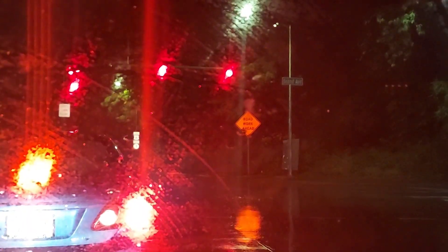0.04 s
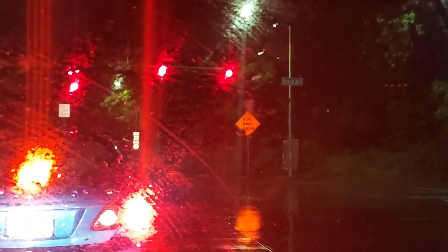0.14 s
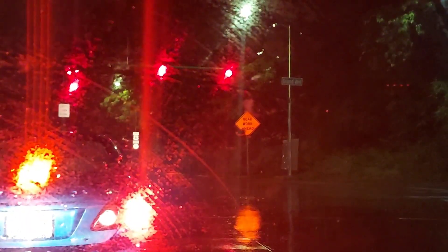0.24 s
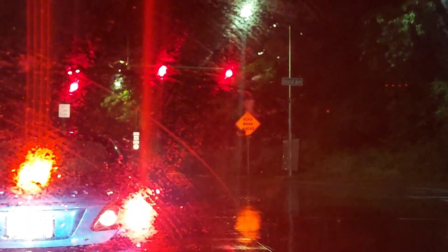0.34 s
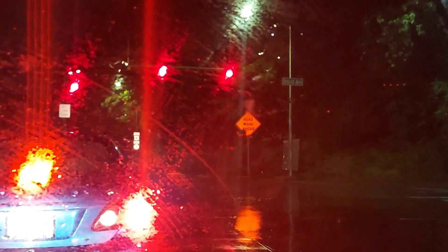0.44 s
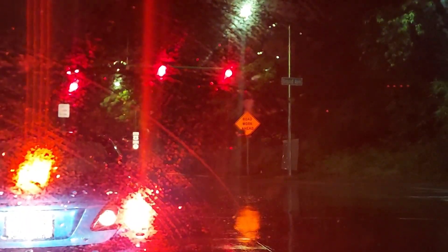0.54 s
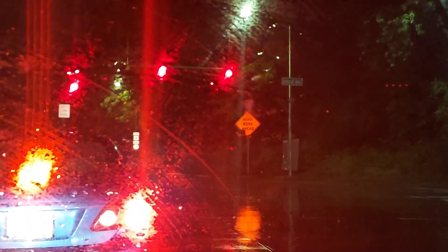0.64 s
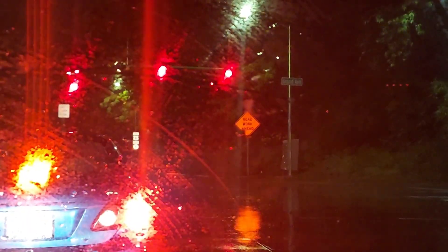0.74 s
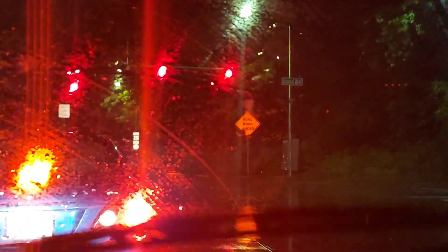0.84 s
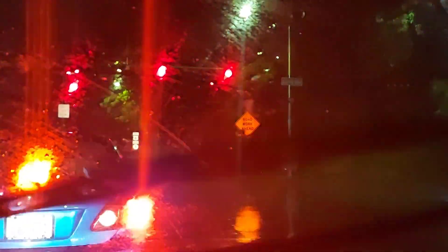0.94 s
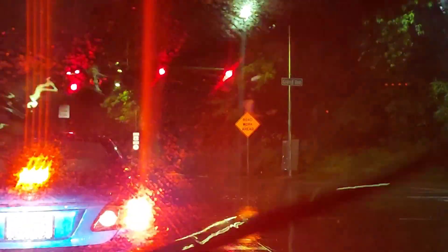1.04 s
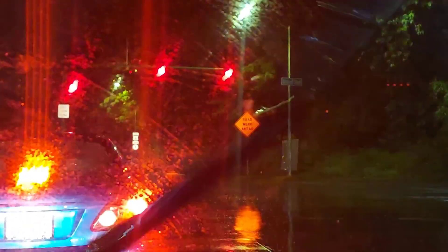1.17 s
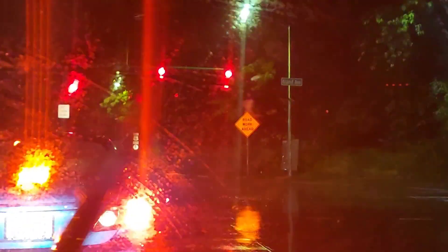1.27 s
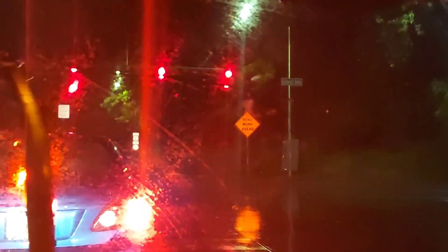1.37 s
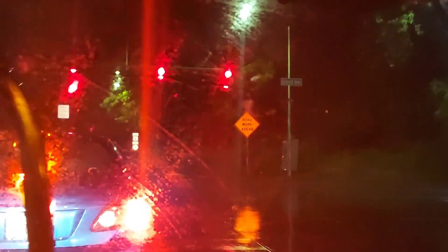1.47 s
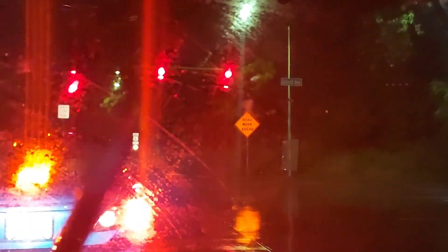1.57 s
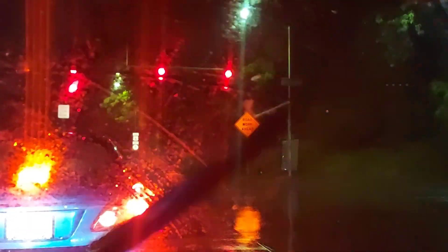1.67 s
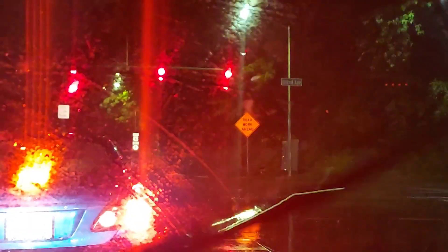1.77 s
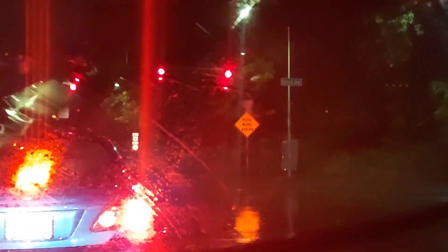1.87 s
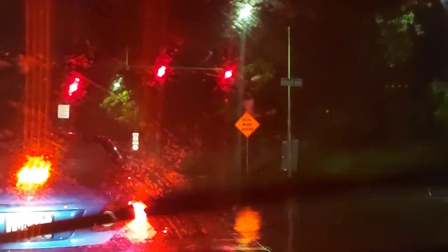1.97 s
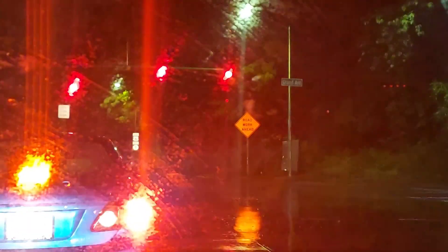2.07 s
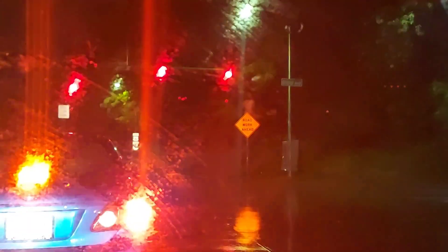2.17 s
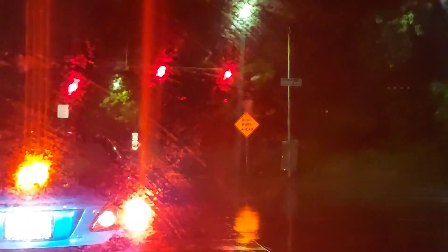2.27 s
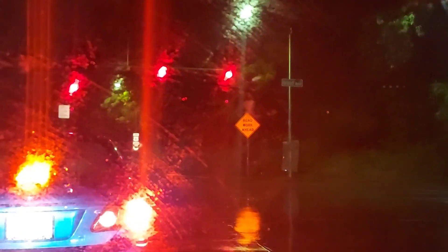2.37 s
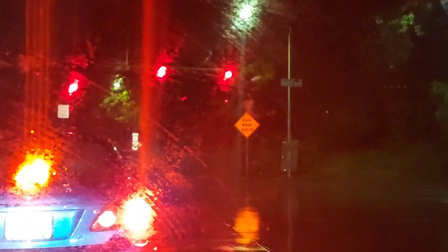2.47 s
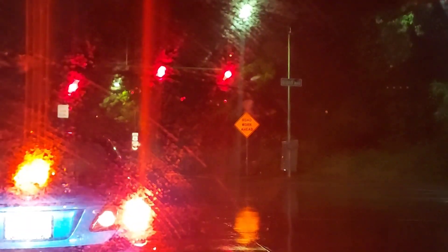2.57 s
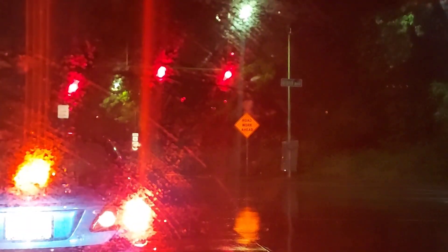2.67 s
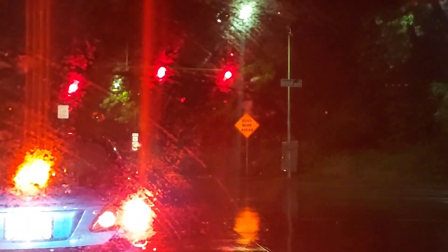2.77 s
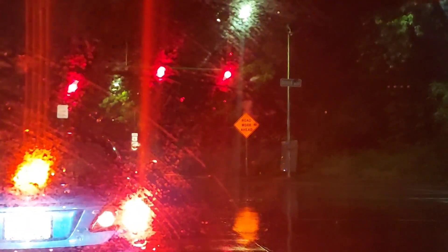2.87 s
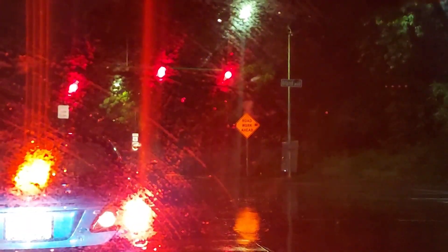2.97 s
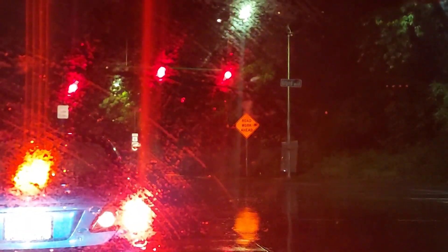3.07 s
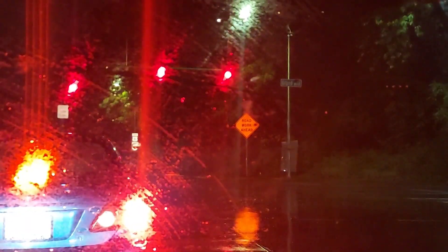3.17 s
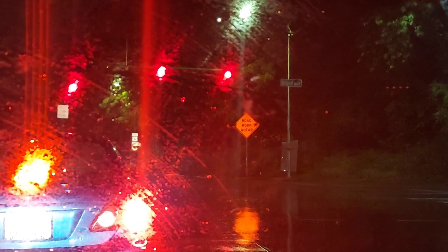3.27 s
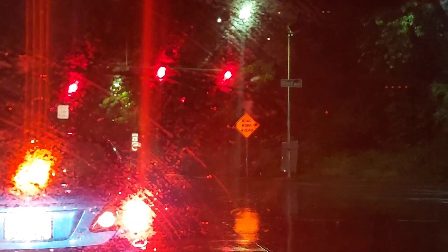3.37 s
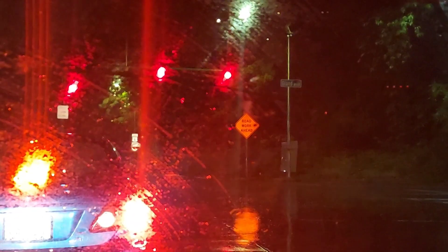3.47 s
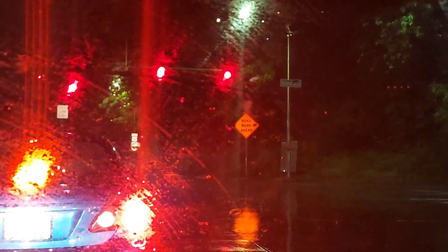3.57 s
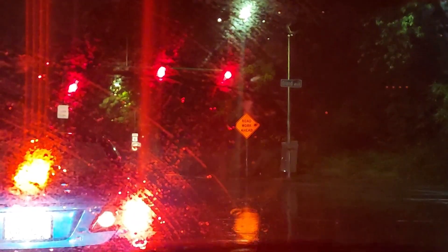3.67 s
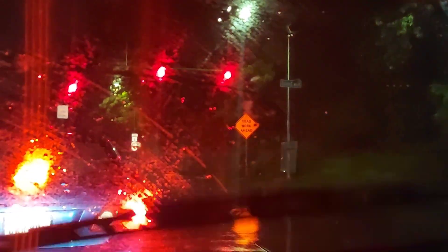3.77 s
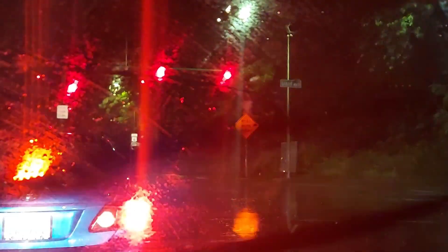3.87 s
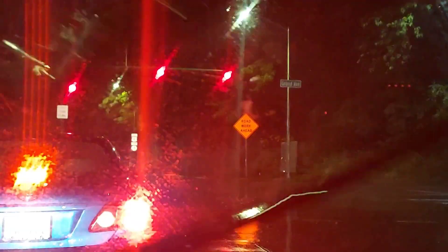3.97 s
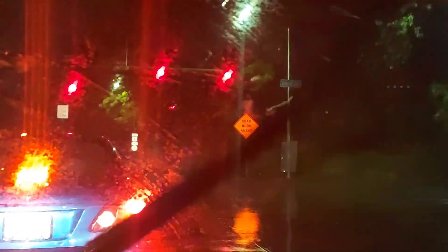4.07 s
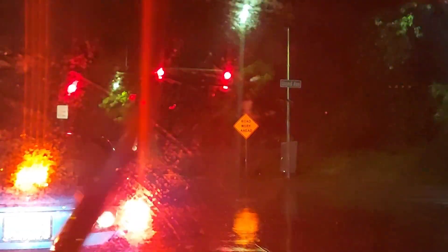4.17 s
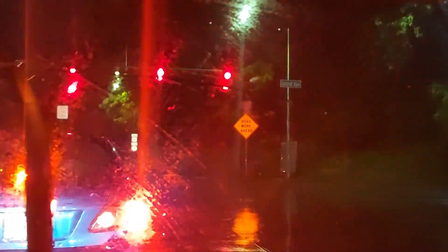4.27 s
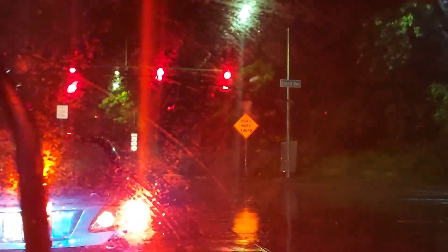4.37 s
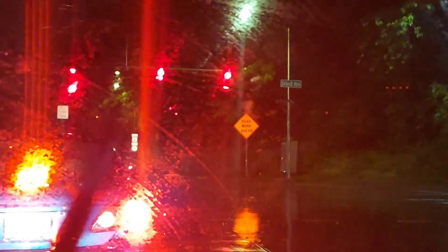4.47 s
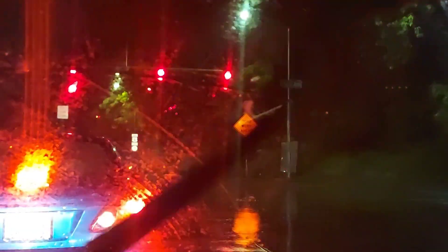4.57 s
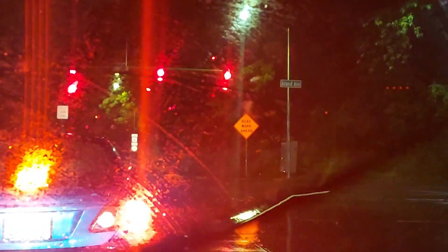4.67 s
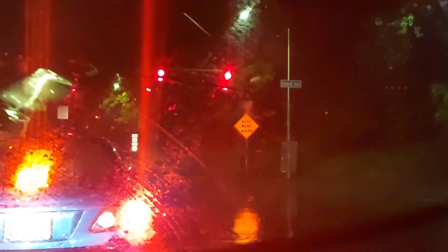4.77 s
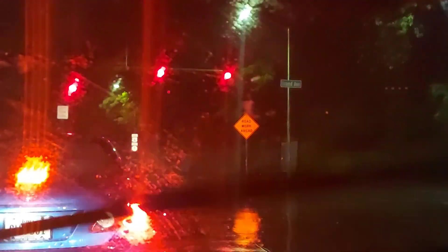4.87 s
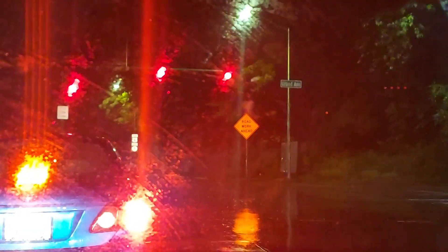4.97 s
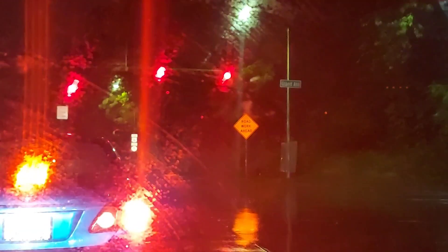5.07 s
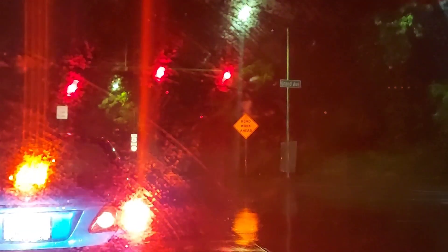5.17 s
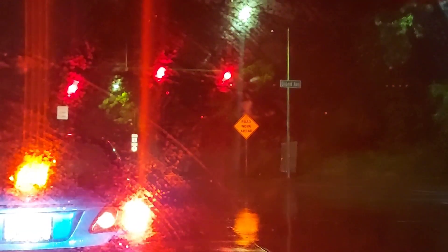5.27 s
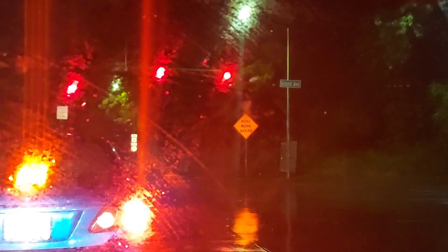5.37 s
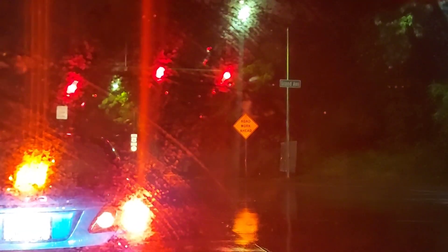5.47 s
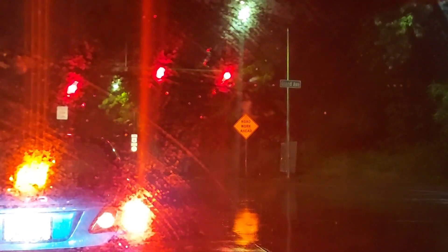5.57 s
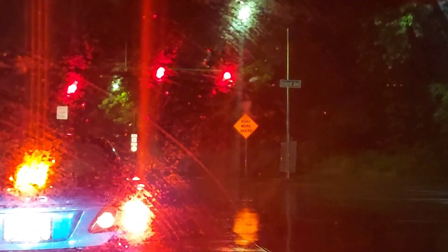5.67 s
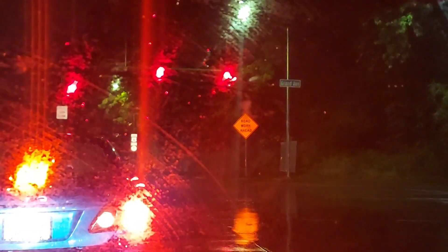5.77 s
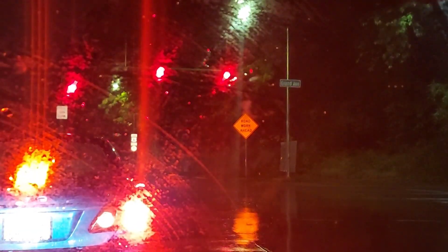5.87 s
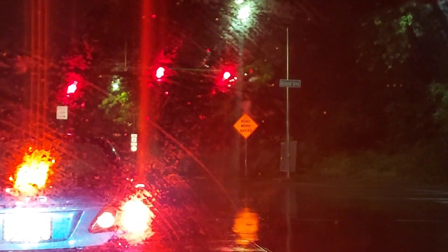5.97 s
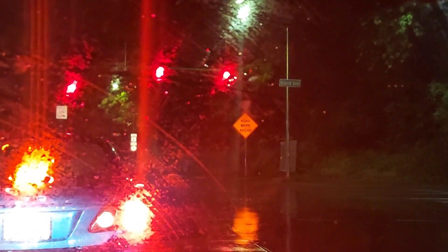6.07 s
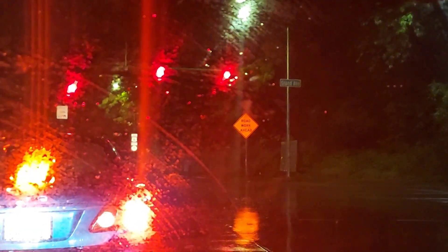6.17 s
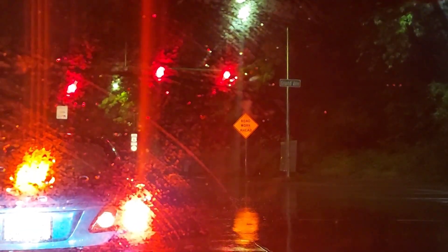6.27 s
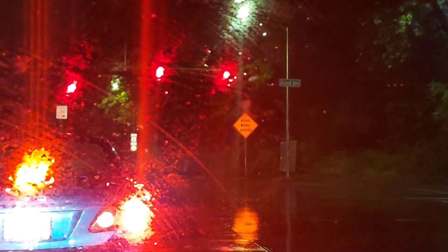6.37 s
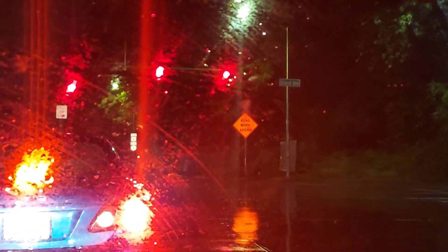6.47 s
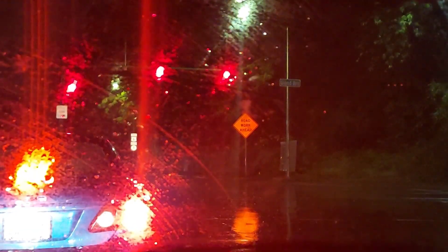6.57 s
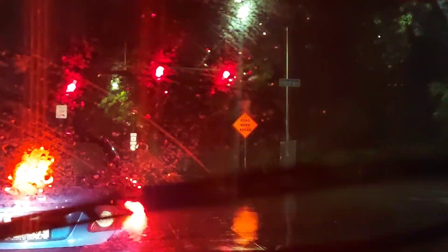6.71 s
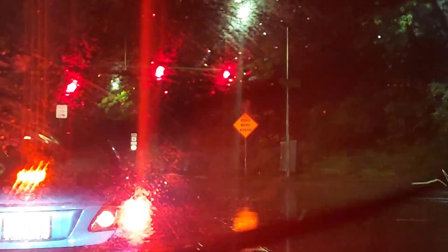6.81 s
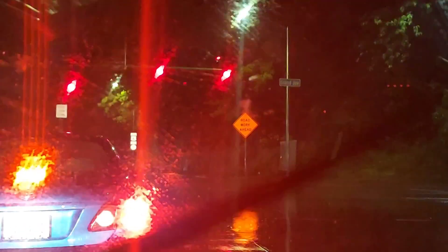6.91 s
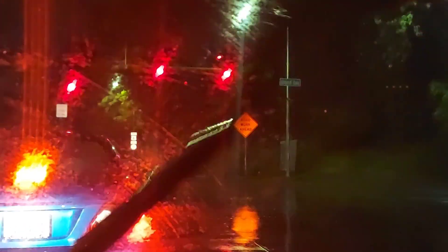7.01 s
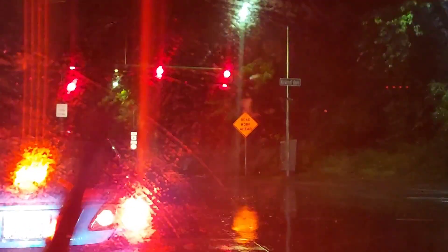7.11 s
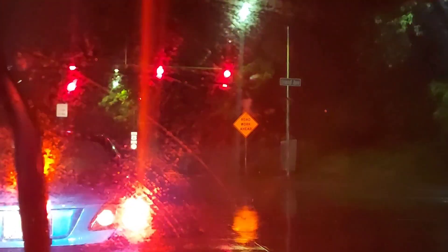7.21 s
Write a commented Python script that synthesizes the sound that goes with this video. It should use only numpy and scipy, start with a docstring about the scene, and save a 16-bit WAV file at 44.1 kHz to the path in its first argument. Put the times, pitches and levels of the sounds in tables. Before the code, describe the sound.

Inside an idling car in night rain, wipers sweep every few seconds with paired deep thuds and rubbery drag over low cabin rumble.

```python
"""Inside a car idling in the rain at night, the wipers make a sweep every few seconds.
The blades flip with a thud as they set off and at the top: runs of slips ring the body, and rubber slaps the glass.
Between flips the rubber drags as filtered noise and the arm judders as gliding sines.
The engine hums in sines, a blower whirs in narrow noise bands, and rain is a wash of shaped noise
with small and large drops, over a low cabin rumble."""
import sys
import numpy as np
from scipy import signal
from scipy.fft import rfft, irfft
from scipy.io import wavfile
from scipy.ndimage import uniform_filter1d

SR = 44100
rng = np.random.default_rng(int(sys.argv[2]) if len(sys.argv) > 2 else 0)


def master_out(mix):
    """Clip the mix to full scale and print it as 16-bit PCM to the path in sys.argv[1]."""
    frames = np.transpose(np.atleast_2d(mix))
    ceiling = np.clip(frames, -1, 1)
    pcm = np.round(ceiling * 32767).astype(np.int16)
    wavfile.write(sys.argv[1], SR, pcm)


N = 319408  # length in samples

# All levels are mix levels, ahead of the tone shaping in record().
# Ringing modes of dash, glass and cabin: (f/Hz, t60/s, first swing before force, negative = inward)
BODY_MODES = [(48.85, .366, .086), (69.2, .415, -.2255), (109.3, .243, -.169), (117.9, .114, .384),
              (139.4, .157, -.064), (247.9, .25, .0126)]
# A flip rolls along the blade as a run of slips, one table per kind: setting off, turning, a soft extra slap:
# (slips, spacing t/s, index of strongest slip, spread in slips, direction,
#  slap peak t/s after the first slip, slap width t/s at 300 Hz)
SET_OFF = (5, .0073, 7.68, 6.68, -1, .005, .012)
TURN = (5, .019, 2.34, 1.11, 1, .046, .026)
SOFT_SLAP = (2, .019, .5, 1.5, -1, .01, .02)
PARK = SOFT_SLAP  # only a label in the next table: a soft extra slap, with the turn or late in the return
# When the blades flip, and how hard:
# (kind, t/s, force level/dB, slap level/dB, slap brightness dB per octave, water hiss level/dB)
FLIPS = [(SET_OFF, .7583, -2.9, -36, .6, -52), (TURN, 1.5117, 0.0108, -30.5, -1.2, -50.5),
         (PARK, 2.2, -30, -44.5, -1.5, -68), (SET_OFF, 3.6582, -3.4, -35.5, -0.76, -51),
         (TURN, 4.4163, .01, -31, -1.2, -50.5), (PARK, 4.4, -28, -44, -1.7, -59),
         (SET_OFF, 6.5588, -3.4, -35.5, -1.6, -58)]
# Resonances the slap rings in: (f/Hz, width f/Hz, level/dB at brightness 0)
SLAP_MODES = [(161, 47, 0), (250.4, 50, -3.5), (314, 49, -6), (447, 63, -8.5), (527, 71, -12.5),
              (676, 80, -16.5), (825, 60, -20), (1172, 64, -24), (1380, 260, -27)]
# Resonances the dragged rubber excites: (f/Hz, width f/Hz, relative level/dB)
DRAG_MODES = [(69, 14, 1), (110.7, 22.4, -2), (129.2, 31, 0), (163.6, 22, -13)]
# Drag over one sweep, hardest around the flips: (t/s after setting off, level/dB)
DRAG_ENVELOPE = [(-.07, -60), (-.055, -35), (0.0, -32), (.09, -31.5), (.18, -35.5), (.42, -43.5), (.5, -55),
                 (.68, -44), (.76, -32), (.87, -31), (.98, -45.5), (1.4, -41.5), (1.58, -48), (1.63, -67)]
# Bouts of arm judder on the way up, through the turn and late in the return stroke:
# (start t/s, stop t/s, mid-bout f/Hz, rms level/dB)
JUDDERS = [(0.968, 1.254, 48.5, -34), (1.398, 1.55, 48, -40), (2.201, 2.375, 47, -38.5),
           (3.849, 4.147, 48.5, -32.5), (4.22, 4.45, 51.3, -39), (5.102, 5.252, 45.5, -34),
           (6.832, 7.065, 49.1, -31.5), (7.098, 7.3, 49.9, -37.5)]
JUDDER_BUILD_S, JUDDER_STOP_S, JUDDER_GLIDE_HZ_PER_S = .12, 0.039, 5.2

IDLE_HZ = 10.42  # mean crankshaft turns a second
# Engine hum partials: (multiple of crankshaft f, mean rms level/dB)
ENGINE_ORDERS = [(2, -60), (4, -43.5), (5, -55), (6, -62), (8, -61), (9, -62), (10, -50), (11, -60),
                 (12, -50), (14, -63)]
# Blower and engine-bay tones, slightly fuzzy: (f/Hz, width f/Hz, mean rms level/dB)
WHIR_TONES = [(177.5, 2.6, -67.5), (312.4, 11.2, -60.5), (358.3, 10.4, -60.5), (376.6, 24, -58.5),
              (527, 5.6, -72), (642, 22, -69), (1440, 6, -73.5), (2180, 31, -71), (5290, 37, -77.5)]

# Colour of the rain: (f/Hz, relative level/dB per Hz)
RAIN_COLOUR = [(290, -59.5), (500, -6), (569, -19), (629, -25), (706, -26), (770, -11), (1630, -9),
               (3390, -11), (5600, -16), (6560, -18), (8750, -20.5), (9810, -27.5), (11800, -19),
               (14300, -27), (15600, -41)]
RAIN_DB = -57  # wash level between swishes
# Narrow resonances of the vents and the microphone housing, heard in the wash: (f/Hz, width f/Hz, level/dB)
HOUSING_MODES = [(3260, 370, 4.5), (5100, 95, 3.5), (5960, 123, 8), (6435, 93, 10.5), (6650, 94, 9),
                 (7140, 140, 6.5), (8460, 98, 6.5), (8750, 80, 8), (8900, 90, 9.5), (11630, 350, 2.5),
                 (12000, 210, 4.5), (12800, 90, 5), (14400, 200, -2)]
# Larger drops: (t/s, level/dB ahead of the attack)
BIG_DROPS = [(0.2279, -51), (1.3828, -56), (1.7784, -53), (2.0961, -52), (2.6694, -56), (3.2944, -48),
             (4.7094, -54), (5.2854, -68), (5.3253, -62), (5.5994, -57), (6.9062, -45), (6.9641, -48.5)]
# The rain swells while the blades push water up the glass; times run from setting off
SWISH_DB, SWISH_MID_S, SWISH_WIDTH_S = 1.5, 0.16, .4

# Colour of the cabin rumble: (f/Hz, relative level/dB per Hz)
RUMBLE_COLOUR = [(15, -15), (30, -15), (42, -17), (52, -14), (82, -9), (123, -7.5), (206, -14.5),
                 (270, -14), (362, -14), (415, -18), (600, -23), (945, -29.5), (1500, -39.5), (3300, -100)]
RUMBLE_DB = -47

# Stereo image: (f/Hz, left-right likeness from -1 opposed to 1 identical)
LIKENESS = [(60, .97), (130, .92), (290, .72), (640, .5), (950, .05), (1400, -.38), (1900, -.2),
            (2400, -.02), (3100, -.15), (5000, .08), (6800, .2), (7600, -.03), (8800, .4), (9500, -.1)]
# Stereo balance: (f/Hz, left minus right level/dB)
LEFT_BALANCE = [(40, -.8), (60, .3), (110, 1.6), (250, .7), (500, -.7), (1000, -2.1), (2000, -3.5),
                (4000, -6.5), (8000, -6.8), (15000, -7.5)]
LEFT_LAG_S, LAG_FADES_HZ = 0.00039, 400  # the lag of the left side fades above this frequency
BASS_CUT_HZ, EDGE_HZ = 36, 15700


def flips():
    """Each slip kicks the body modes; the rubber slaps the glass and throws off water on the way."""
    t = np.arange(SR // 2) / SR
    out, sprays = np.zeros((2, N)), np.zeros(N)
    ring = sum(swing * gain_of(-60 * t / t60) * np.sin(2 * np.pi * hz * t) for hz, t60, swing in BODY_MODES)
    for kind, s, force_db, slap_db, bright_db, hiss_db in FLIPS:
        slips, spacing, strongest, spread, direction, slap_s, slap_width_s = kind
        for k in range(slips):
            strength = np.exp(-((k - strongest) / spread) ** 2 / 2)
            add(out, s + k * spacing, direction * strength * gain_of(force_db) * ring)
        slap_at = s + slap_s
        add(out, slap_at - t[-1] / 2, slap(t, slap_width_s, slap_db, bright_db))
        spray = gain_of(hiss_db) * drop_envelope(t, 0.39, slap_width_s / 2)
        add(sprays, slap_at - slap_width_s, spray)
    hiss = noise(lambda hz: softened_rain(hz, 4.8), 1.3, 0.37, size=512)
    return out + hiss * sprays


def slap(t, width_s, level_db, bright_db):
    """Rubber on glass: gritty noise rings each mode under a swell that is briefer in the treble."""
    grit = rng.standard_normal(len(t)) + 0.47 * rng.standard_normal((2, len(t)))
    out = np.zeros((2, len(t)))
    for hz, width, db in SLAP_MODES:
        swell = np.exp(-((t - t[-1] / 2) / width_s * (hz / 300) ** 0.39) ** 2 / 2)
        # matching the rms of the swell keeps the energy free of chance
        rung = evened(swell * resonate(grit, hz, width)) * np.sqrt(np.mean(swell ** 2))
        out += gain_of(level_db + db + bright_db * np.log2(hz / 250)) * rung
    return out


def sweeps():
    """The times at which the blades set off."""
    return [s for kind, s, *_ in FLIPS if kind is SET_OFF]


def strokes():
    """The dragged rubber rumbles in the higher body modes, alike on every sweep."""
    grit = rng.standard_normal(N) + 0.24 * rng.standard_normal((2, N))
    drag = evened(sum(gain_of(db) * evened(resonate(grit, hz, width)) for hz, width, db in DRAG_MODES))
    t = np.arange(N) / SR
    after_s, level_db = np.transpose(DRAG_ENVELOPE)
    pressure = np.zeros(N)
    for s in sweeps():
        pressure += gain_of(np.interp(t - s, after_s, level_db, left=-np.inf, right=-np.inf))
    return drag * pressure


def judders():
    """The arm judders near the lowest body mode: it builds up, creeps upward and stops short."""
    out = np.zeros(N)
    for start, stop, hz, db in JUDDERS:
        t = np.arange(0, stop - start, 1 / SR)
        shape = np.clip(np.minimum(t / JUDDER_BUILD_S, t[::-1] / JUDDER_STOP_S), 0, 1)
        glide = hz + JUDDER_GLIDE_HZ_PER_S * (t - t[-1] / 2)
        turns = np.cumsum(glide) / SR + rng.random()
        add(out, start, np.sqrt(2) * gain_of(db) * shape * np.sin(2 * np.pi * turns))
    return out


def engine():
    """Low crankshaft orders as sines; idle speed and strength waver."""
    turns = np.cumsum(IDLE_HZ * (1 + 0.0039 * wander(SR // 2, count=N))) / SR
    out = np.zeros(N)
    for order, db in ENGINE_ORDERS:
        level = np.sqrt(2) * gain_of(db + 0.77 * wander(SR // 8, count=N))
        out += level * np.sin(2 * np.pi * (order * turns + rng.random()))
    return out


def whir():
    """Narrow wavering bands of noise, as alike left and right as the cabin allows."""
    out = np.zeros((2, N))
    for hz, width, db in WHIR_TONES:
        right, own = rng.standard_normal((2, N))
        pair = resonate(np.array([left_of(right, own, hz), right]), hz, width)
        out += gain_of(db + 1.45 * wander(SR // 6, count=N)) * evened(pair)
    return out


def rain():
    """A flickering wash with small drops ticking on the roof and a few larger ones."""
    wash = noise(wash_colour, 0.79, 0.55, size=2048, ripple_db=-0.5)
    splash = noise(lambda hz: softened_rain(hz, 4.2), 2.3, .6, size=512)
    t = np.arange(2000) / SR
    # about 70 small drops a second on each side
    drop_gain = gain_of(2.7 * np.minimum(rng.exponential(1, (2, N)), 3))
    ticks = drop_gain * (rng.random((2, N)) < 70. / SR)
    bursts = 0.47 * signal.oaconvolve(ticks, drop_envelope(t, 0.074, 0.0016)[None])[:, :N]
    big_drops = np.zeros(N)
    for s, db in BIG_DROPS:
        add(big_drops, s, gain_of(db) * drop_envelope(t, 0.052, 0.0022))
    time = np.arange(N) / SR
    swish = sum(np.exp(-((time - s - SWISH_MID_S) / SWISH_WIDTH_S) ** 2) for s in sweeps())
    level = gain_of(RAIN_DB + SWISH_DB * swish)
    return level * (wash + bursts * splash) + big_drops * splash


def wash_colour(hz):
    """Rain spectrum in dB with the narrow resonances on top."""
    return read(RAIN_COLOUR, hz) + sum(db / (1 + (2 * (hz - f) / w) ** 2) for f, w, db in HOUSING_MODES)


def softened_rain(hz, slope_db):
    """Rain spectrum in dB, bending down above 3 kHz towards slope_db per octave."""
    return read(RAIN_COLOUR, hz) - slope_db * np.log2(1 + hz / 3000)


def rumble():
    """Low noise fills the cabin, nearly alike on both sides in the deep bass."""
    return gain_of(RUMBLE_DB) * noise(lambda hz: read(RUMBLE_COLOUR, hz), 1.5, 0.56, size=4096)


def noise(shape_db, patchy_db, flicker_db, size, ripple_db=0.03):
    """Stereo noise of rms 1 from random short-time spectra, with patches, a shared flicker and a fixed ripple."""
    frames, hz = 4 * N // size + 5, np.fft.rfftfreq(size, 1 / SR)
    a, b, c, d, patches = rng.standard_normal((frames, len(hz), 5)).T  # each is frequency by time
    patches = uniform_filter1d(patches, size // 40, 0)
    patches = evened(uniform_filter1d(patches, 8192 // size, 1))
    flicker = wander(4096 // size, count=frames) / (1 + (hz[:, None] / 5000) ** 4)  # the top treble stays smooth
    ripple = wander(size // 512, count=len(hz))[:, None]
    right = a + 1j * b
    spectra = np.array([left_of(right, c + 1j * d, hz[:, None]), right])
    spectra *= gain_of(shape_db(hz)[:, None] + patchy_db * patches + flicker_db * flicker + ripple_db * ripple)
    return evened(signal.istft(spectra, nperseg=size, noverlap=3 * size // 4)[1][:, :N])


def left_of(right, own, hz):
    """Left noise from the right and its own, blended at constant power to the likeness at hz."""
    same = np.clip(read(LIKENESS, hz), -1, 1)
    return same * right + np.sqrt(1 - same ** 2) * own


def resonate(x, hz, width):
    """A resonance of gain 1, applied twice for steep flanks."""
    pole = np.exp((2j * np.pi * hz - np.pi * width) / SR)
    once = signal.lfilter([1 - abs(pole)], [1, -pole], x)
    return 2 * signal.lfilter([1 - abs(pole)], [1, -pole], once).real


def drop_envelope(t, t60, rise_s):
    """A soft attack with an exponential decay."""
    return gain_of(-60 * t / t60) * (1 - np.exp(-t / rise_s))


def wander(window, count):
    """Slow chance of rms 1: noise smoothed twice over a window of so many steps."""
    once = uniform_filter1d(rng.standard_normal(count), window)
    return evened(uniform_filter1d(once, window))


def read(points, hz):
    """Reads a spectrum table on a log-frequency axis."""
    f, value = np.transpose(points)
    return np.interp(np.log(hz + 1), np.log(f + 1), value)


def gain_of(db):
    """Decibels to a factor."""
    return 10 ** (np.asarray(db) / 20)


def evened(x):
    """Scales to rms 1."""
    return x / np.sqrt(np.mean(x ** 2) + 1e-20)


def add(mix, s, sound):
    """Mixes a sound in from time s, cut off at the end of the mix."""
    part = mix[..., round(s * SR):][..., :sound.shape[-1]]
    part += sound[..., :part.shape[-1]]


def scene():
    """Wipers up front, then engine and blower, with rain and rumble behind."""
    return flips() + strokes() + judders() + engine() + whir() + rain() + rumble()


def record(dry):
    """Bass cut; the left side has less treble, and its bass comes slightly later; then the band limit."""
    hz = np.fft.rfftfreq(N, 1 / SR)
    tilt = gain_of(read(LEFT_BALANCE, hz) / 2)  # half the balance on each side
    lag = np.exp(-2j * np.pi * hz * LEFT_LAG_S / (1 + (hz / LAG_FADES_HZ) ** 2))
    bass_cut = 1 / np.sqrt(1 + (BASS_CUT_HZ / (hz + 1)) ** 8)
    sides = irfft(rfft(dry) * [tilt * lag, 1 / tilt] * bass_cut, N)
    low_pass = signal.firwin(1023, EDGE_HZ, window=("kaiser", 9), fs=SR)
    return signal.oaconvolve(sides, low_pass[None], "same")


dry = scene()
out = record(dry)
master_out(out)
```